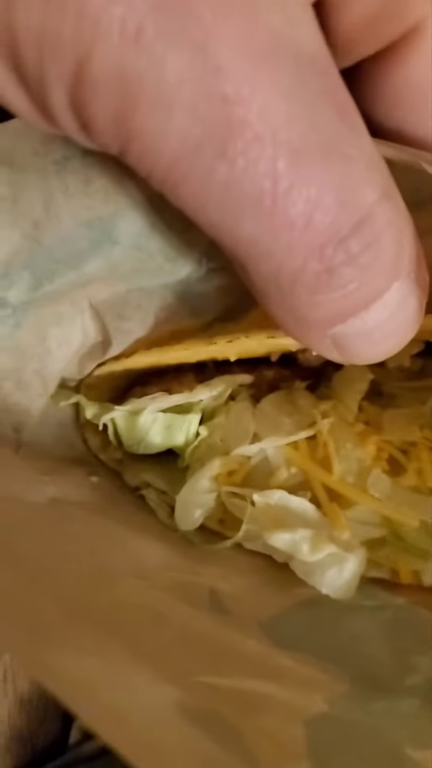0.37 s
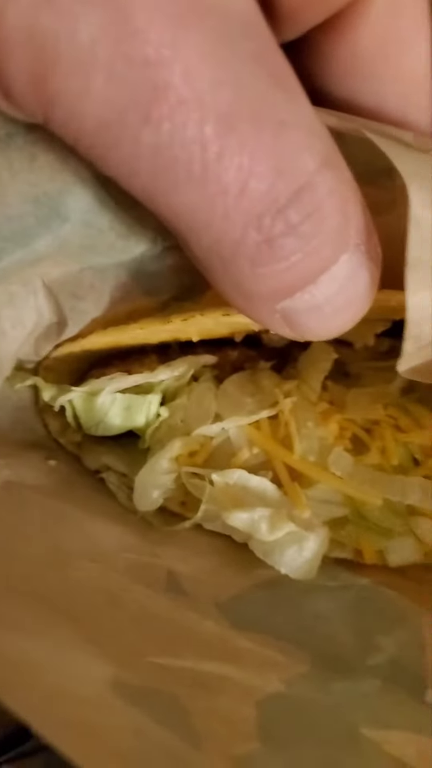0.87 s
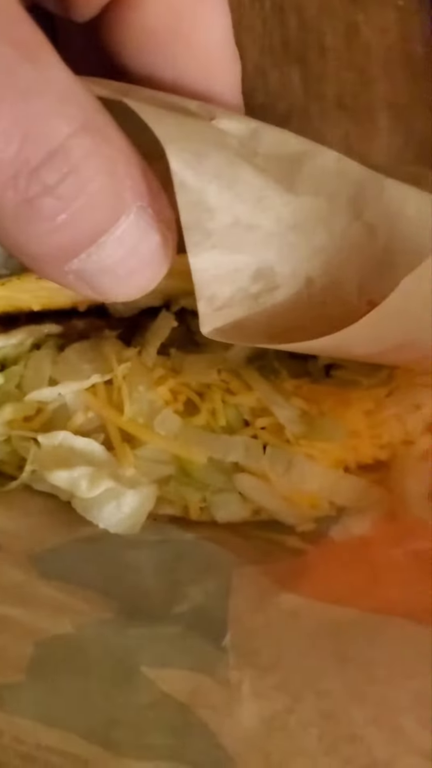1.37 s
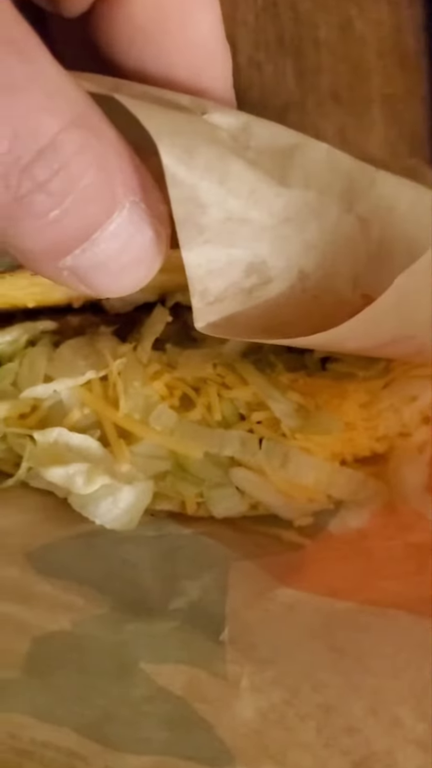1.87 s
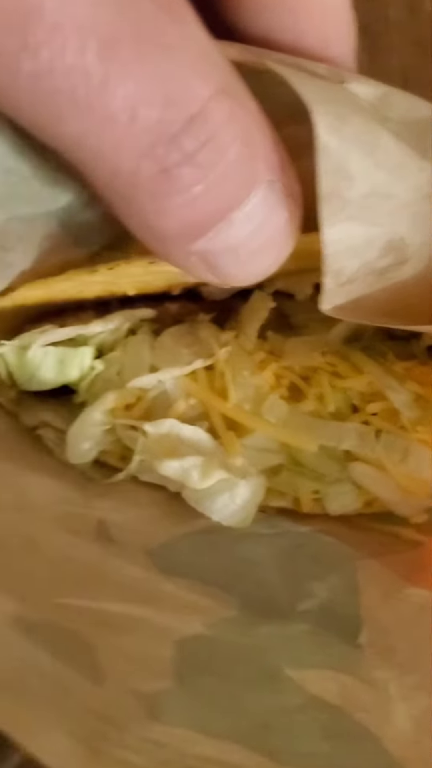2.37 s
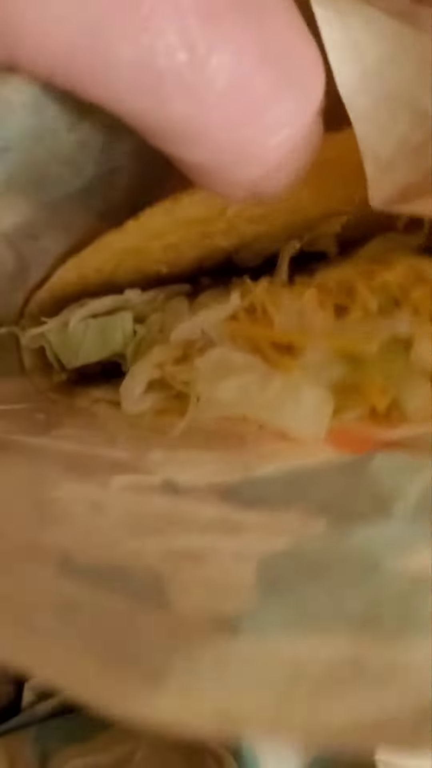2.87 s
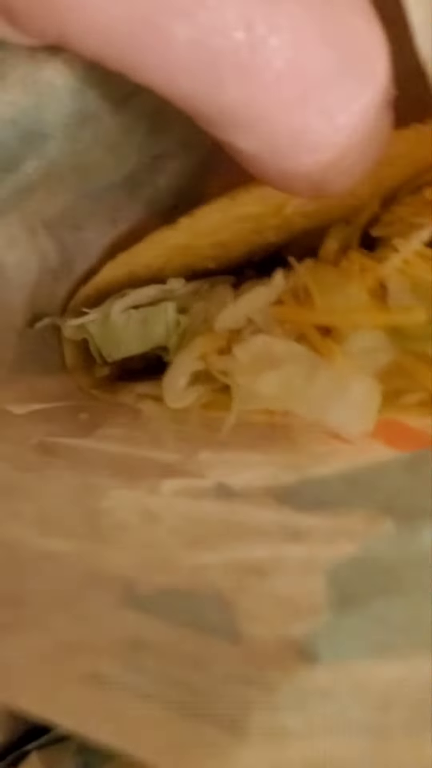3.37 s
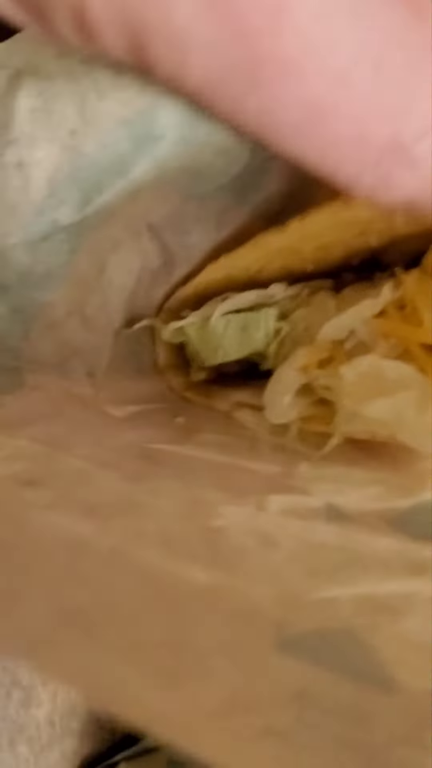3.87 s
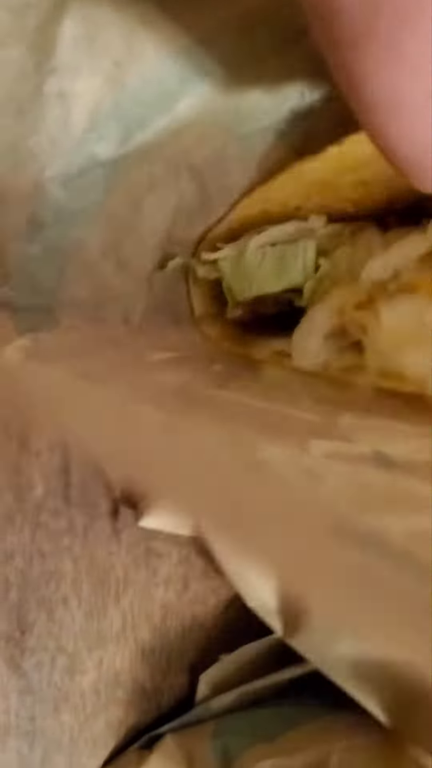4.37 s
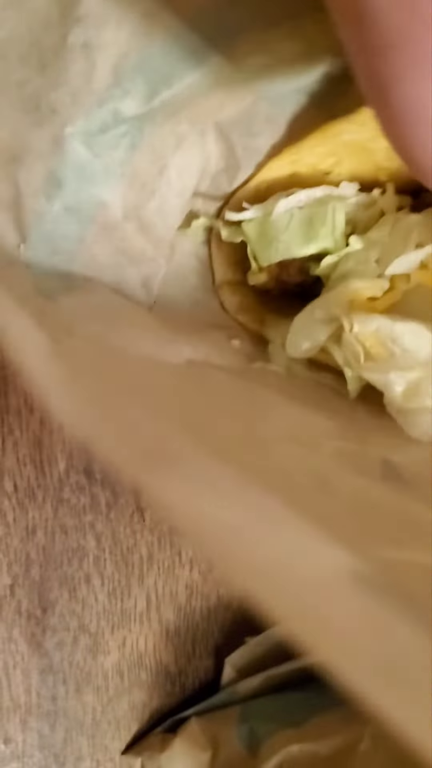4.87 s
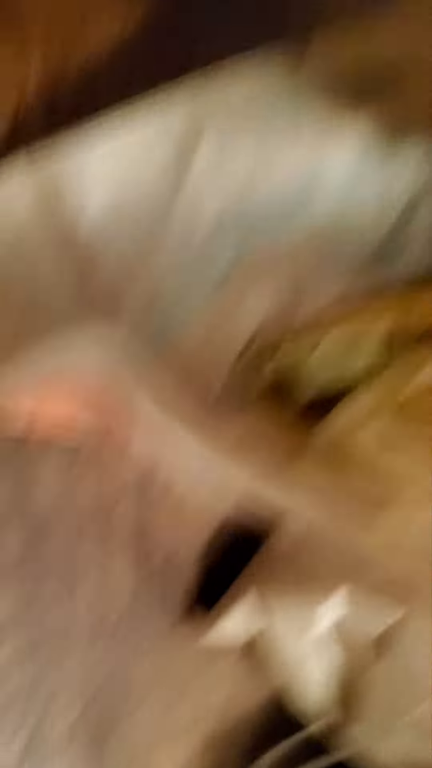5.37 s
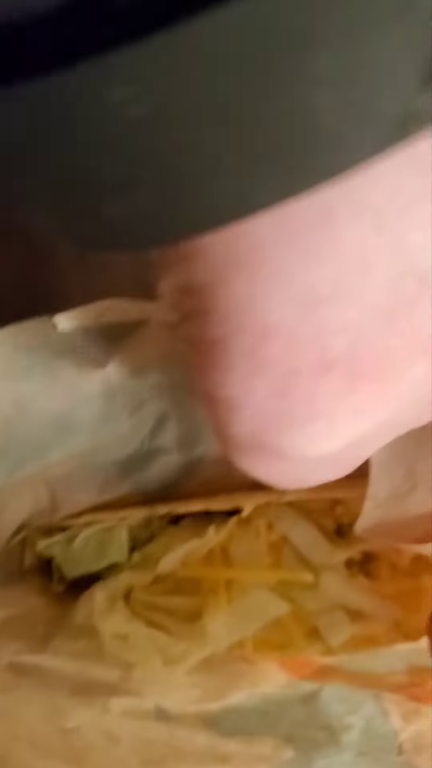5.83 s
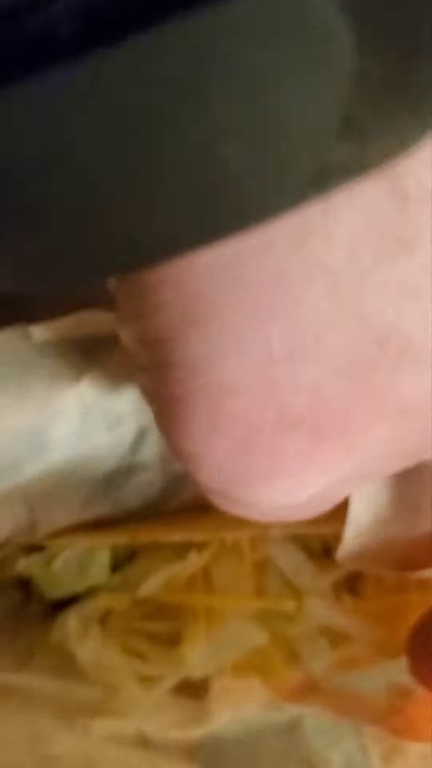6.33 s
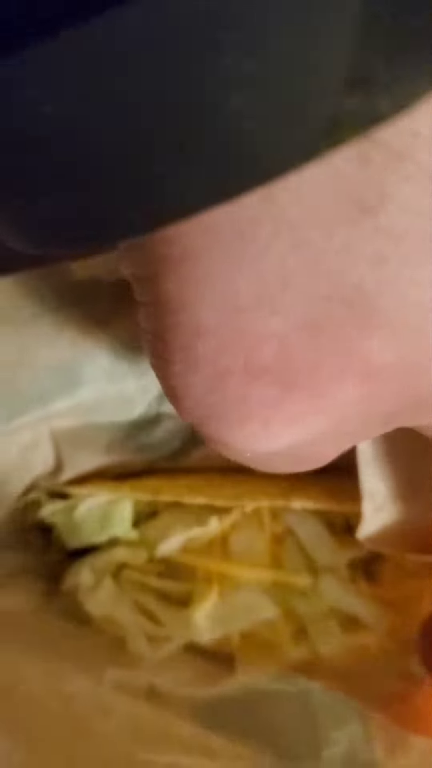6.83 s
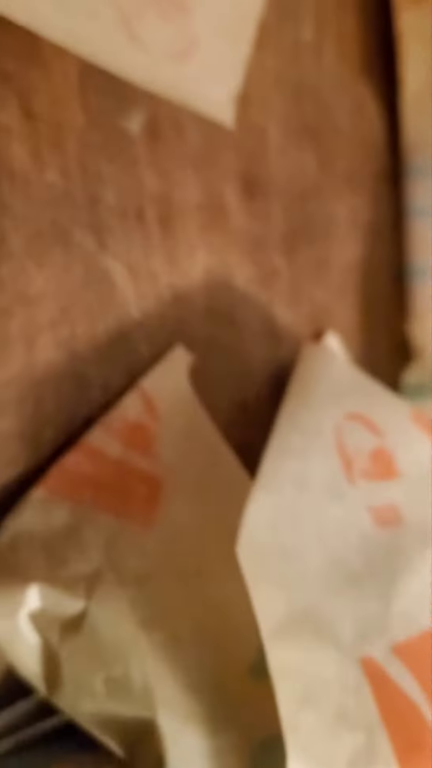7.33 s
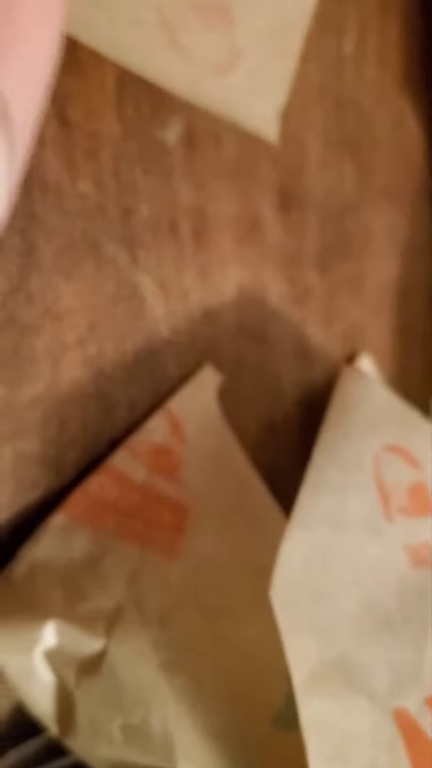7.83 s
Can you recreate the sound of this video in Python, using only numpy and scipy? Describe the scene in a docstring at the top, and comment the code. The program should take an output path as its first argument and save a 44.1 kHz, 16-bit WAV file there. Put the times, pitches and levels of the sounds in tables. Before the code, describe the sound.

A hand opens and shifts crisp paper wrappers close under a phone microphone. At first there is mostly low airy fan noise and gentle sliding paper. Midway the creases pop rapidly, rubbing sheets hiss and the table bumps dully. The crackling stays irregular and busy, then a sheet briefly drags on the wood and things settle. Short, dry room echo.

```python
"""A low fan drone and a soft slide of paper open the scene; then thin food wrappers crackle, snap and rustle.
A hand folds and shifts them on a wooden table, close under a phone with two microphone ports.
Creases are short noise bursts that ring small panels of paper; rubbing sheets are noise roughened by tiny cracks.
The table thuds faintly as decaying sines over filtered rumble, and a small furnished room echoes the paper."""
import sys
import numpy as np
from scipy import signal
from scipy.fft import rfft, irfft, next_fast_len
from scipy.io import wavfile
from scipy.ndimage import uniform_filter1d

SR = 44100
rng = np.random.default_rng(int(sys.argv[2]) if len(sys.argv) > 2 else 0)


def persist_wave(psi):
    """Save psi, clipped to +-1, as 16-bit WAV."""
    counts = np.round(np.clip(psi, -1, 1) * 32767).astype(np.int16)
    wavfile.write(sys.argv[1], SR, np.atleast_2d(counts).T)


def natural_amplitude(level_db):
    """Convert a level in decibels to a linear amplitude factor, elementwise."""
    exponent = np.asarray(level_db, float) / 20
    return 10 ** exponent


N = 362237

# Creases that snap loudly enough to point at. Each row: moment in seconds, peak in dB before its lean to
# one side, panel pitch in Hz, treble in dB (the panel sits at -9.5), time scale of the tear in ms.
SNAPS = [(0.304, -31.5, 3440, -16, 1.34), (0.431, -18.5, 2420, -3, 3.2), (0.437, -26, 3560, -10, 3),
         (0.684, -49, 750, -36, 2.2), (0.982, -54, 1980, -27, 1.9), (1.097, -47, 689, -1, 1.8),
         (1.163, -41.5, 670, -39, 1.3), (1.315, -45.5, 1380, -16, 1.8), (1.345, -44, 1500, -35, 1.9),
         (2.409, -53, 1500, -32, 1.9), (2.45, -38.5, 1840, -19, 1.3), (2.482, -43.5, 1910, -15, 1.8),
         (2.534, -40, 2600, -19, 1.6), (2.563, -40.5, 2070, -38, 1.6), (2.597, -35, 1630, -28, 1.2),
         (2.642, -26, 1960, -8, 1.7), (2.7, -19, 1100, 3, 1.6), (2.717, -29, 2150, -32, 1.04),
         (2.727, -23.5, 2630, -31, 1.36), (2.794, -15, 2000, -3.5, 1.57), (2.8, -12.5, 1500, -9, 1.43),
         (2.934, -33, 935, -6, 2), (2.992, -15.5, 1800, -10, 2.7), (3.026, -14.5, 1670, -9, 2.37),
         (3.039, -27, 1400, -10, 2), (3.14, -44, 880, -21, 1.6), (3.185, -25, 3470, -7, 1.83),
         (3.237, -44, 2900, -25, 1.7), (3.265, -39, 2600, 6, 1.3), (3.283, -17.5, 2480, -15, 1.3),
         (3.301, -35, 790, -29, 3.6), (3.475, -20.5, 2580, -5, 1.58), (3.528, -22, 680, -3, 1.6),
         (3.635, -28, 1970, -10.5, 3.1), (3.678, -23, 2700, -12, 2.1), (3.765, -25, 2630, -6, 1.7),
         (3.769, -19, 2660, -2.5, 1.43), (3.854, -30, 2680, -9.5, 1.6), (3.985, -27.5, 2040, -10, 2.65),
         (4.066, -34, 865, -20, 2.4), (4.078, -30, 935, -19, 2.9), (4.122, -23, 2650, -10.5, 1.3),
         (4.185, -28, 813, 2, 1.7), (4.232, -18.5, 834, -4, 1.9), (4.255, -19.5, 2280, -11, 2),
         (4.274, -16.5, 1200, -6.5, 1.57), (4.413, -19, 1200, -29, 2.6), (4.418, -17.5, 2120, -8, 2),
         (4.438, -9, 3900, -8, 3.3), (4.449, -7.5, 810, -15.5, 2.54), (4.507, -27, 738, 2, 2),
         (4.526, -27.5, 1240, -31, 1.54), (4.574, -18.5, 1210, -31, 2.56), (4.586, -21, 670, -10, 2.03),
         (4.689, -8, 1190, -1, 1.64), (4.788, -16.5, 925, 0, 1.12), (4.896, -19.5, 1170, 13, 1.9),
         (4.908, -8, 1800, -5.5, 1.53), (4.939, -25, 606, 6, 2.6), (4.988, -21, 590, -8.5, 2),
         (5.029, -32, 810, -29, 1.6), (5.066, -24.5, 1410, -37, 1.12), (5.158, -26, 557, -35, 3.24),
         (5.201, -15.5, 2420, -11, 4.1), (5.24, -17, 2310, -5.5, 1.5), (5.263, -25, 1300, -7, 1.3),
         (5.33, -13, 1030, 0, 1.93), (5.362, -10.5, 2110, -6.5, 2), (5.377, -10.5, 620, -2, 1),
         (5.459, -20, 1680, -24, 1.8), (5.51, -26.5, 1250, -9, 2.4), (5.536, -13.5, 1250, -14.5, 2.43),
         (5.56, -29, 866, -17, 2.7), (5.621, -29, 1200, -26, 1.23), (5.644, -31, 710, -33, 0.94),
         (5.681, -31.5, 544, -7, 1.4), (5.734, -17, 1910, 29, 1.44), (5.767, -25, 1900, 4, 1.5),
         (5.828, -31, 1500, 1, 1.4), (5.833, -27, 1720, -8.5, 1.8), (5.854, -16, 1950, -8, 1.65),
         (5.864, -23, 1050, -11, 1.27), (5.925, -17.5, 774, -1.5, 3), (5.972, -29.5, 2000, 8, 1.3),
         (5.98, -7.5, 1374, -13.5, 1.53), (5.991, -19, 1500, 3, 2.1), (6.119, -37, 1500, -18, 1.8),
         (6.151, -34.5, 850, -21, 1.5), (6.232, -33, 630, 2, 1.8), (6.261, -16, 666, 3, 1.13),
         (6.278, -15.5, 1980, -7, 0.57), (6.296, -14.5, 1940, -8.5, 2.8), (6.353, -40, 720, -27, 3),
         (6.376, -24.5, 900, -12.5, 1.55), (6.432, -28, 1500, -22, 0.65), (6.468, -30.5, 810, -40, 1.1),
         (6.519, -36, 1420, -35, 1.6), (6.565, -26.5, 1150, -22, 1.7), (6.632, -23, 1800, -28, 0.91),
         (6.645, -7.5, 1700, -3.5, 2.4), (6.659, -20, 677, -9, 2.25), (6.671, -24.5, 1500, -24, 1.46),
         (6.688, -20.5, 1200, 5, 2), (6.707, -25, 1500, -15, 1.05), (6.722, -12, 1150, -11, 2.66),
         (6.737, -13.5, 1500, -2.5, 2.6), (6.743, -15, 1200, -6, 1.1), (6.783, -25.5, 1960, -15.5, 0.99),
         (6.792, -23.5, 820, -11, 1.33), (6.863, -20.5, 1130, -3.5, 1.6), (6.871, -23, 2130, -5.5, 1.64),
         (6.944, -25, 1880, -7, 2.6), (7.016, -13, 1620, -1.5, 1.7), (7.074, -18, 1500, -9, 3.4),
         (7.126, -18, 1520, -6, 2), (7.176, -10.5, 1500, -3.5, 1.08), (7.183, -11, 1680, 3, 2.7),
         (7.269, -18, 2160, -4.5, 1.36), (7.317, -26, 1890, 2, 2.1), (7.363, -28.5, 2580, -3, 1.4),
         (7.558, -32, 2200, -13, 2.1), (7.569, -20, 2440, -6.5, 1.13), (7.617, -33.5, 480, -52, 1.25),
         (7.684, -35.5, 1960, -46, 1.2)]
# The hand's steady fidgeting with the paper. Each row: time in seconds, rustle drive in dB.
HANDLING = [(0, -62), (.1, -72.5), (.4, -63.5), (.63, -75), (.9, -74.5), (1.75, -72.5), (2.35, -99),
            (2.62, -57), (2.9, -59), (3.42, -65), (3.8, -62), (3.97, -51), (4.15, -46.5), (4.34, -52),
            (4.5, -52), (4.66, -47), (4.75, -62.5), (4.83, -56), (4.98, -45), (5.11, -53.5), (5.3, -51.5),
            (5.42, -45.5), (5.52, -56), (5.81, -62), (6.15, -62.5), (6.43, -54.5), (6.61, -64.5),
            (6.88, -68), (7.2, -51.5), (7.26, -60), (7.55, -64.5), (7.75, -67.5), (8.21, -69.5)]
# Tone colour of a thin sheet. Each row: frequency in Hz, gain in dB.
SHEET = [(90, -19.5), (300, -7.5), (700, 1), (1200, -2.5), (1800, -0.5), (2700, 2), (3600, -2.5),
         (6000, -19)]
ALIKE = 0.32  # share of the paper noise's power that both ports hear alike


def level(x, db):
    """Scale to an rms level in dB."""
    return x * natural_amplitude(db) / np.sqrt(np.mean(x ** 2))


def colour(x, points):
    """Shape the spectrum by (Hz, dB) points joined on a log frequency axis."""
    hz, db = np.transpose(points)
    size = next_fast_len(x.shape[-1])
    f = np.arange(size // 2 + 1) * SR / size
    gain = natural_amplitude(np.interp(np.log(f + 1), np.log(hz), db))
    return irfft(rfft(x, size) * gain, size)[..., :x.shape[-1]]


def ring(x, hz, width_hz):
    """A resonance, gain 1 at its centre."""
    return signal.lfilter(*signal.iirpeak(hz, hz / width_hz, fs=SR), x)


def above(x, hz):
    """High-pass."""
    return signal.sosfilt(signal.butter(3, hz, "high", fs=SR, output="sos"), x)


def pair(size, alike):
    """Noise for two ports, partly shared."""
    shared, left, right = rng.standard_normal((3, size))
    alike = np.clip(alike, 0, 1)
    return np.sqrt(alike) * shared + np.sqrt(1 - alike) * np.array([left, right])


def walk(rate):
    """Random values, rate of them per second, joined by straight slides; spread near 1."""
    k = int(SR / rate)
    steps = np.repeat(rng.standard_normal(N // k + 1), k)
    return np.sqrt(1.5) * uniform_filter1d(steps, k)[:N]


def along(curve):
    """Columns of a curve, sample by sample."""
    s, *columns = np.transpose(curve)
    return [np.interp(np.arange(N) / SR, s, c) for c in columns]


def crackle(rate, spread_db, tail_ms):
    """Envelope of many tiny decaying cracks (rate per second), few large and most small; rms 1."""
    sizes = natural_amplitude(spread_db * np.minimum(rng.exponential(size=N), 2.5))
    starts = (rng.random(N) < rate / SR) * sizes
    return level(signal.lfilter([1], [1, -np.exp(-1000 / (tail_ms * SR))], starts), 0)


def fan():
    """Low air noise from the right, wavering a little around its resonances, with a few brief hums."""
    # Spectrum of the moving air. Each row: frequency in Hz, gain in dB.
    air_colour = [(30, -22), (60, -3), (110, -1), (200, 0.5), (320, 5.5), (460, -6.5), (680, -0.5),
                  (900, -8.5), (2000, -15.5), (4000, -26.5), (8000, -52), (16000, -92)]
    # Brief hums in the drone. Each row: time in seconds (the hum peaks 15 ms later), peak in dB at the right.
    hum_rows = [(0.833, -55), (1.226, -51), (1.756, -52.5)]
    air = colour(pair(N, 0.67), air_colour)
    waver = sum(ring(air, hz, .12 * hz) * .5 * walk(18) for hz in (320, 690))
    t = np.arange(N) / SR
    tone = np.sin(2 * np.pi * 345 * t)
    hums = sum(natural_amplitude(db) * np.exp(-((t - s - .015) / 0.0067) ** 2) * tone for s, db in hum_rows)
    air = level(air + waver, -64) + hums
    # the left port hears it 20 samples later and softer
    return np.array([np.roll(air[0], 20) * natural_amplitude(-1.5), air[1]])


def wooden_table():
    """The board rumbles under the moving hand and rings briefly when knocked."""
    # Weight on the table. Each row: time in seconds, rumble in dB ahead of the lean to the left.
    weight = [(0, -61), (2.3, -112), (2.58, -65.5), (3.94, -70.5), (4.44, -48.5), (4.62, -59.5),
              (5.28, -55.5), (5.75, -63.5), (6.4, -62.5), (6.75, -78), (6.98, -54.5), (7.11, -64.5),
              (7.33, -63.5), (7.95, -70), (8.21, -65)]
    # Knocks by the hand or the food. Each row: start in seconds, level in dB ahead of attack, decay and
    # port balance, pitch in Hz, time to fall 60 dB in seconds.
    thuds = [(4.274, -48.5, 183, 0.045), (4.447, -43, 109, 0.19), (4.693, -26.5, 148, 0.024),
             (4.8, -49, 175, 0.26), (5.183, -37, 69.5, 0.039), (5.38, -42.5, 195, 0.12),
             (7.616, -54, 74.4, 0.072), (8.187, -49, 112, 0.24)]
    rumble_db, = along(weight)
    noise = pair(N, 0.3) * natural_amplitude(2.2 * walk(18))
    board = level(ring(noise, 125, 120) + 0.87 * ring(noise, 240, 158), 0)
    out = board * natural_amplitude(rumble_db + np.array([[2.5], [-2.5]]))
    for s, db, hz, t60 in thuds:
        t = np.maximum(np.arange(N) / SR - s, 0)
        tone = np.sin(2 * np.pi * hz * t + np.array([[0], [1.3]]))  # out of step between the ports
        attack = 1 - np.exp(-t / 0.0006)
        knock = tone * attack * natural_amplitude(db - 60 * t / max(t60, .01))
        out = out + knock * np.array([[1.3], [.8]])
    return above(out, 36)


def drag():
    """A flat sheet drags over the wood: friction noise sings through its broad, flickering resonances."""
    # How strongly the sheet sings. Each row: time in seconds, level in dB.
    strength = [(7.18, -95), (7.27, -50), (7.4, -59), (7.54, -77), (7.6, -102)]
    # Resonances of the flat sheet. Each row: centre in Hz, width in Hz, relative level in dB before flicker.
    sheet_modes = [(1520, 140, -2), (1940, 120, 2), (2700, 180, 2.5)]
    noise = pair(N, ALIKE)
    modes = sum(level(ring(noise, hz, width_hz), db) * natural_amplitude(3.7 * walk(25)) for hz, width_hz, db in sheet_modes)
    return level(modes, 0) * natural_amplitude(along(strength)[0])


def swell(s, hold_s, rise_db_per_s, fall_db_per_s):
    """Power that rises, holds at 1 and falls away."""
    t = np.arange(N) / SR - s
    return natural_amplitude(-2 * (rise_db_per_s * np.maximum(-t, 0) + fall_db_per_s * np.maximum(t - hold_s, 0)))


def fade(power, db_per_s):
    """Power that dies away after each impulse."""
    return signal.lfilter([1], [1, -natural_amplitude(-2 * db_per_s / SR)], power)


def motion():
    """Rustle and hiss drives in dB: steady handling, single slides, faint noise ahead of and after each snap."""
    # Single slides of sheet over sheet. Each row: moment of full speed in seconds, hold in seconds,
    # rustle drive in dB, hiss in dB against that rustle.
    slides = [(0.126, 0.081, -54.5, -10), (0.453, 0.057, -63.5, 6.5), (0.905, 0.035, -66.5, -26),
              (1.366, 0.039, -52.5, 2), (1.431, .02, -62, -3), (1.773, 0.051, -69, -8),
              (2.681, 0.043, -45, -10), (2.949, 0.025, -51, -5.5), (3.438, 0.016, -57, 1.5),
              (3.515, 0.039, -47.5, 0), (4.242, 0.043, -41, -6), (4.414, 0.006, -38, -4),
              (4.438, 0.016, -31.5, -2.5), (4.789, 0.046, -50, -2.5), (5.162, 0.015, -43.5, -1.5),
              (5.358, 0.099, -43, -0.5), (5.716, 0.019, -45, -7), (6.032, 0.031, -42, 2),
              (6.197, 0.029, -47, -1), (6.284, 0.01, -44, -4.5), (6.547, 0.01, -46.5, 0.5),
              (6.938, 0.1, -44, -3), (7.058, 0.095, -42, 2), (7.262, 0.062, -55.5, 6.5),
              (7.33, 0.24, -67, 9.5), (7.994, 0.067, -55.5, -11), (8.175, 0.029, -57.5, -20)]
    slide_rise_db_per_s, slide_fall_db_per_s = 605, 317
    # a faint hissy noise is heard just ahead of a snap; level against the snap's peak, hiss against its rustle
    ahead_db, ahead_db_per_s, ahead_hiss_db = -38, 810, -2
    # the freed sheet rustles on after it, likewise
    settle_db, settle_db_per_s, settle_hiss_db = -36, 313, -15
    steady_db, = along(HANDLING)
    # hiss lies 4 dB under a rustle of -52 dB and gains on it as the hand gets busier
    steady_hiss_db = steady_db - 4 + 0.16 * (steady_db + 52.0)
    rustle, hiss = natural_amplitude(2 * steady_db), natural_amplitude(2 * steady_hiss_db)  # twice the dB: power
    for s, hold_s, db, hiss_db in slides:
        power = natural_amplitude(2 * db) * swell(s, hold_s, slide_rise_db_per_s, slide_fall_db_per_s)
        rustle = rustle + power
        hiss = hiss + power * natural_amplitude(2 * hiss_db)
    freed = np.zeros(N)
    for s, db, *_ in SNAPS:
        freed[int(s * SR)] += natural_amplitude(2 * db)
    settle = natural_amplitude(2 * settle_db) * fade(freed, settle_db_per_s)
    ahead = natural_amplitude(2 * ahead_db) * fade(freed[::-1], ahead_db_per_s)[::-1]  # a fade turned round in time
    hiss = hiss + settle * natural_amplitude(2 * settle_hiss_db) + ahead * natural_amplitude(2 * ahead_hiss_db)
    return 10 * np.log10(rustle + settle + ahead), 10 * np.log10(hiss)


def rub():
    """Sliding sheets: friction noise, roughened by tiny cracks the harder the hand presses."""
    # How much slack sheet moves with the fingers. Each row: time in seconds,
    # level in dB of its low flap against the body of the rustle.
    slack = [(0, -7), (2.4, -49), (3.7, -23), (4.1, -21.5), (5.1, 0), (5.8, -10), (7.1, -6), (7.35, -9.5),
             (8.2, 7)]
    rustle_db, hiss_db = motion()
    handling_db, = along(HANDLING)
    pressure = np.clip((np.minimum(rustle_db, handling_db + 8) + 69.5) / 14, .15, 1)
    grain = 0.71 + 0.53 * pressure * crackle(200, spread_db=4.0, tail_ms=2.5)
    # the sheets catch and let go
    friction = pair(N, ALIKE) * grain * natural_amplitude(1.2 * walk(90) + 1.2 * pressure * walk(30))
    # buckling panels colour the rustle, now one, now another
    body = colour(friction, SHEET)
    body = body + sum(ring(body, hz, 0.032 * hz) * 1.9 * pressure * walk(25) for hz in (810, 1210, 1500, 1800))
    flap = level(ring(above(friction, 128), 530, 1460), 0)
    body = level(body, 0) + flap * natural_amplitude(along(slack)[0])
    # the finest treble shrinks while the hand's steady handling is nearly still, so slides are duller then
    busy = np.clip((handling_db + 73) / 7, .1, 1)
    finest = level(above(friction, 4670), 6.1) * busy * natural_amplitude(2.2 * walk(55))
    broad = level(ring(ring(above(friction, 1840), 4580, 4900), 5100, 6000), 0)
    hiss = broad * natural_amplitude(2.5 * walk(30)) + finest
    # the smallest fibre cracks prick through the hiss
    hiss = level(hiss * (1 + 0.6 * pressure * crackle(90, spread_db=4.0, tail_ms=1.5)), 1.0)
    return body * natural_amplitude(rustle_db) + hiss * natural_amplitude(hiss_db)


def small_snaps():
    """Lesser creases at random, in rows like those of SNAPS: more often and louder the busier the hand."""
    most_per_s = 30
    chance, spread = rng.random((400, 2)), rng.standard_normal((400, 4))
    s = chance[:, 0] * N / SR
    rustle_db = np.interp(s, *np.transpose(HANDLING))
    busy = np.clip((rustle_db + 67.5) / 14, 0, 1)
    peak_db = rustle_db + 15.5 - 2 * spread[:, 0]
    pitch_hz = np.clip(1200 * np.exp(0.15 * spread[:, 1]), 400, 4000)
    treble_db = -4.5 + 8 * spread[:, 2]
    tear_ms = 2.1 * np.exp(0.23 * spread[:, 3])
    rows = np.transpose([s, peak_db, pitch_hz, treble_db, tear_ms])
    return list(rows[chance[:, 1] < busy * most_per_s * N / SR / len(s)])


def snaps():
    """A crease gives way in a short ragged burst of fibre cracks that swells, stops and rings the panel beside it."""
    size = 4096
    t = np.arange(size) / SR
    out = np.zeros((2, N + size))
    for s, db, hz, treble_db, tear_ms in SNAPS + small_snaps():
        u = t * 1000 / max(tear_ms, .3)
        ragged = natural_amplitude(3.44 * np.repeat(rng.standard_normal(size // 24 + 1), 24)[:size])
        # the tear runs and ends abruptly; the loose sheet flutters on more weakly
        tear = u ** 2 * np.exp(-u ** 2 / 2)
        flutter = 0.17 * np.minimum(u / 2, 1) ** 2 * np.exp(-t / 0.005)
        cracks = pair(size, ALIKE) * ragged
        burst = cracks * (tear + flutter)
        panel = level(ring(burst, hz, 120 + 0.067 * hz), 0)
        overtone_hz = hz * (1.2 + 0.547 * rng.random())
        panel = panel + level(ring(burst, overtone_hz, 0.043 * hz), -10.0)
        # panels above 1300 Hz pitch the whole sheet's colour upward, lower ones downward
        sheet = colour(burst, [(f * np.sqrt(hz / 1300), g) for f, g in SHEET])
        panel = panel + level(sheet, -1.2)
        treble = above(cracks * (tear + 0.47 * flutter), 3010)  # flutter is dull
        snap = level(panel, -9.5) + level(treble, treble_db)
        snap = snap * natural_amplitude(db) / np.abs(snap).max()
        side_db = 3.6 * rng.standard_normal()  # each crease lies a little to one side
        # the tear's envelope peaks 2 ms after its listed moment
        i = max(int((s + 0.002 - np.sqrt(2) * tear_ms / 1000) * SR), 0)
        out[:, i:i + size] += snap * natural_amplitude(np.array([[side_db], [-side_db]]) / 2)
    return out[:, :N]


def ports(x):
    """The left port hears the hand earlier or later, louder or softer, as it moves."""
    # Where the hand is. Each row: time in seconds, delay of the left port in ms, left minus right in dB.
    hand = [(0, 0.49, 0), (.9, 0.27, -1), (2.4, -0.12, 0), (4, -0.26, 1), (5.4, -0.29, 1),
            (5.7, -0.11, -3.5), (7.199, -0.13, -2.5), (7.27, 0.42, -3.5), (8.2, 0.45, -1)]
    lag_ms, pan_db = along(hand)
    i = np.clip(np.arange(N) - np.round(lag_ms * SR / 1000).astype(int), 0, N - 1)
    return np.array([x[0, i], x[1]]) * natural_amplitude(np.array([pan_db, -pan_db]) / 2)


def room(x):
    """A short diffuse echo: decaying noise, unlike at the two ports."""
    t60_s, echo_db = 0.11, -13.5
    t = np.arange(int(.4 * SR)) / SR
    tail = rng.standard_normal((2, len(t))) * natural_amplitude(-60 * t / t60_s) * (t > .004)
    tail = colour(tail, [(200, -25.0), (2000, -22.5), (15000, -21.0)])
    tail = tail / np.sqrt(np.sum(tail ** 2, axis=1, keepdims=True))  # unit energy
    return natural_amplitude(echo_db) * signal.fftconvolve(x, tail, axes=1)[:, :N]


def scene():
    """Paper near the phone, its echo, the table, the fan."""
    paper = ports(snaps() + rub() + drag())
    return paper + room(paper) + wooden_table() + fan()


def top_cut(x):
    """Nothing passes above the cut-off."""
    return signal.sosfilt(signal.butter(12, 16970, fs=SR, output="sos"), x)


def record(dry):
    """Capsule hiss joins the sound, then the whole mix takes on a treble colour with a steep upper limit."""
    # Treble colour of the mix: peaks, a notch, a cutoff near 16 kHz. Each row: frequency in Hz, gain in dB.
    treble_colour = [(3500, 3.5), (4600, 0.5), (6900, 6.5), (8000, -0.5), (9600, -5.5), (12000, 0),
                     (15600, 3.5), (16100, -28.5)]
    hiss = natural_amplitude(-78.5) * rng.standard_normal(dry.shape)
    mix = colour(dry + hiss, treble_colour)
    return top_cut(mix)


dry = scene()
out = record(dry)
persist_wave(out)
```